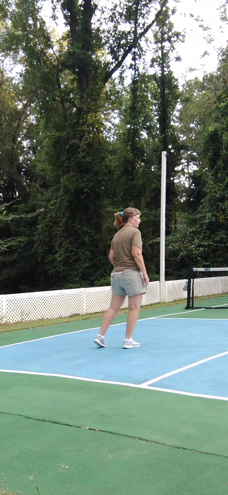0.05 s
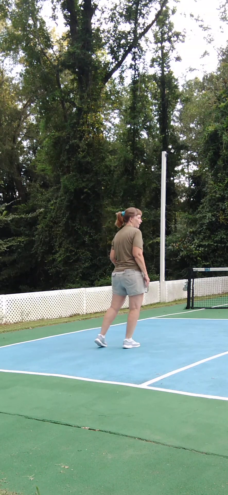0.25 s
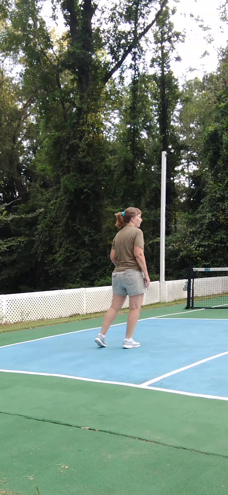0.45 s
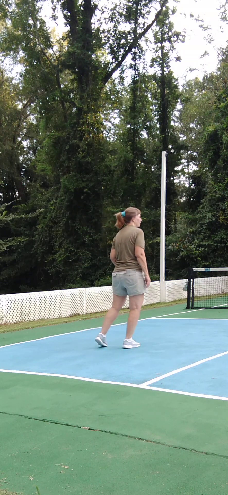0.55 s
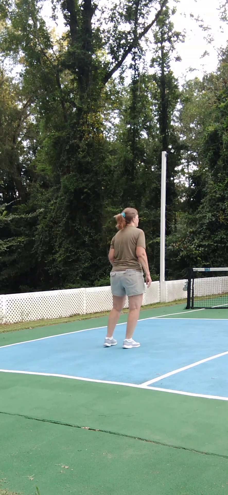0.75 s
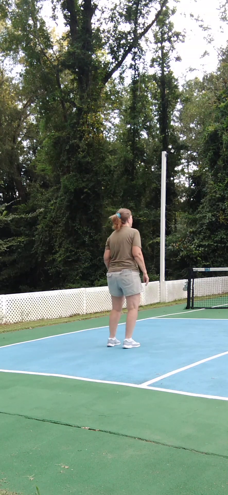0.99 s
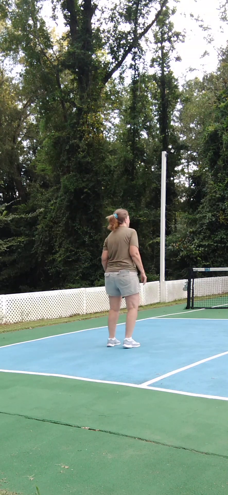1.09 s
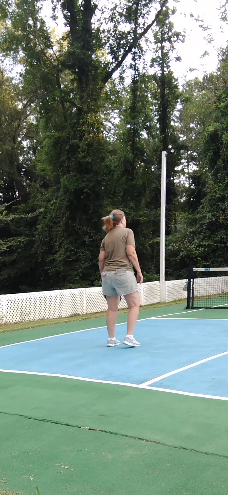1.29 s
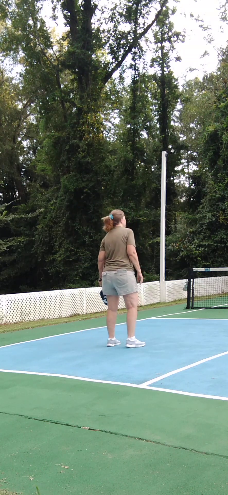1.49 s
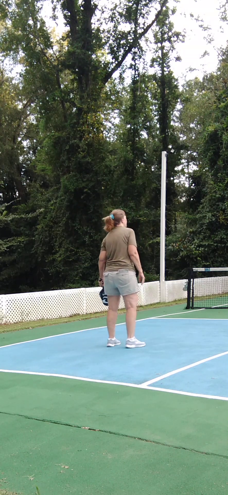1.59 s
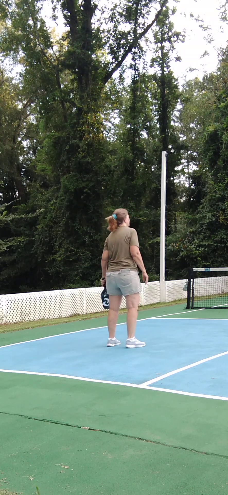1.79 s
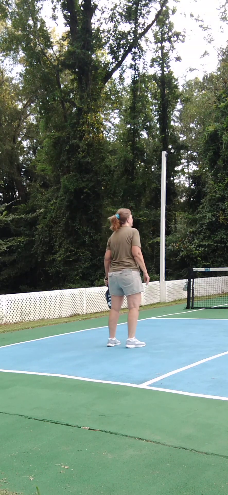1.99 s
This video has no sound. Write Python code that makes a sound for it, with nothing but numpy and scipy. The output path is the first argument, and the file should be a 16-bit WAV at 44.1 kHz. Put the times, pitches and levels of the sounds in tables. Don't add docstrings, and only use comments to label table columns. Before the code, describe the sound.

A paddle pocks a hollow plastic ball once, sharply, on an outdoor court with cicadas hissing

```python
import sys
import numpy as np
from scipy import signal
from scipy.fft import rfft, irfft
from scipy.io import wavfile
from scipy.ndimage import uniform_filter1d

SR = 44100
rng = np.random.default_rng(int(sys.argv[2]) if len(sys.argv) > 2 else 0)


def dump_mix(stems):
    frames = np.atleast_2d(stems).T
    limited = np.clip(frames, -1, 1)
    pcm = np.round(limited * 32767).astype(np.int16)
    wavfile.write(sys.argv[1], SR, pcm)


def decibels_to_gain(level_db):
    exponent = np.asarray(level_db, float) / 20
    return 10 ** exponent


N = 90404
T = np.arange(N) / SR


def shape(table, hz):
    rows = np.array(table, float)
    return np.interp(np.log(hz + 1), np.log(rows[:, 0]), rows[:, 1])


def colour(x, gain_db):
    y = irfft(rfft(x) * decibels_to_gain(gain_db(np.fft.rfftfreq(N, 1 / SR))), N)
    return y / np.sqrt(np.mean(y ** 2))


def bell(centre_hz, octaves):
    return lambda hz: -4.3 * (np.log2((hz + 1) / centre_hz) / octaves) ** 2


def pan(left_over_right_db):
    return left_over_right_db * np.array([[.5], [-.5]])


def pair(like_hz, grain_db=0., density=0.99):
    grains = decibels_to_gain(grain_db * rng.exponential(size=(2, N)))
    present = rng.random((2, N)) < density
    mid, side = rng.standard_normal((2, N)) * grains * present
    side = signal.lfilter(*signal.butter(2, np.clip(like_hz, 20, 9000), "high", fs=SR), side)
    return mid + np.array([[1], [-1]]) * side


def walk(rate_hz):
    k = int(SR / rate_hz)
    held = np.repeat(rng.standard_normal(N // k + 1), k)
    drift = uniform_filter1d(uniform_filter1d(held, k), k)[:N]
    return drift / drift.std()


def fade(start_s, t60_s, rise_s=.0005):
    age = np.maximum(T - start_s, 0)
    return (1 - np.exp(-age / rise_s)) * decibels_to_gain(-60 * age / np.maximum(t60_s, .003))


def hit(start_s, db, push_s, modes, echoes, echo_hz):
    radiates_hz = 210
    age = T[:SR // 4]
    out = np.zeros((2, N))
    push = np.exp(-(age[:40] / push_s - 2) ** 2)
    push = push / push.sum()
    for lag, left_db, right_db in [(0, 0, 0), *echoes]:
        is_echo = lag > 0
        turn = rng.uniform(-0.96, 1, (2, len(modes)))
        at = int((start_s + lag) * SR)
        for c, side_db in enumerate((left_db, right_db)):
            ring = np.zeros(len(age))
            for k, (hz, mode_db, t60) in enumerate(modes):
                phase = np.pi * (is_echo * turn[0, k] + c * turn[1, k] * min(hz / 4200, 1) ** 1.5)
                treble_only = min(hz / echo_hz, 1) ** (2 * is_echo)
                ring += decibels_to_gain(mode_db - 60 * age / t60) * treble_only * np.sin(2 * np.pi * hz * age + phase)
            out[c, at:at + len(age)] += decibels_to_gain(db + side_db) * np.convolve(ring, push)[:len(age)]
    return signal.sosfilt(signal.butter(2, radiates_hz, "high", fs=SR, output="sos"), out)


def scatter(start_s, db, spectrum, t60s, like_hz):
    freqs = np.fft.rfftfreq(N, 1 / SR)
    noise = rfft(colour(pair(like_hz), lambda hz: shape(spectrum, hz)))
    tail = np.zeros((2, N))
    for hz in 45 * 2 ** np.arange(0, 9, .5):
        window = np.clip(1 - 2 * abs(np.log2((freqs + 1) / hz)), 0, 1)
        tail += irfft(noise * window, N) * fade(start_s, shape(t60s, hz), rise_s=.002)
    return decibels_to_gain(db) * tail


def opening_db():
    # (opens [s], starts closing [s], lift [dB])
    openings = [
        (-.05, 0.043, 17.5),
        (0.26, 0.318, 18.5),
        (0.630, 0.776, 16.5),
        (.812, .888, 19),
        (1.05, 1.122, 1),
        (1.409, 1.436, 9),
        (1.69, 1.817, 19),
        (1.86, 1.895, 15.5),
    ]
    open_s, close_db_per_s = .006, 193
    lifts = []
    for opens, closes, db in openings:
        opening = db * (T - opens) / open_s
        closing = db - close_db_per_s * (T - closes)
        lifts.append(np.clip(np.minimum(opening, closing), 0, db))
    return np.max(lifts, axis=0)


def trees():
    # (frequency [Hz], level per Hz [dB])
    cicada = [(5000, -42), (6600, -29), (7500, -15), (8000, -3), (8600, 4), (9000, -4), (9500, -21.5),
              (11200, -36)]
    # (frequency [Hz], level per Hz [dB])
    air = [(15, -51.5), (25, -18), (48, -0.5), (317, -16), (354, -6.5), (390, -22), (6740, -37.5),
           (8360, 0), (16000, -49)]
    clicks_per_s = 16000
    lift = opening_db()

    chorus = colour(pair(200, grain_db=.4, density=clicks_per_s / SR),
                    lambda hz: np.interp(hz, *np.array(cicada).T, -70, -70))
    chorus = chorus * decibels_to_gain(-61.5 + lift + .4 * walk(6) + .6 * walk(40) + pan(-2.2))

    hiss = colour(pair(200), lambda hz: -19 * (hz > 11200) - 40 * (hz < 9200))
    hiss = hiss * decibels_to_gain(-79 + .12 * lift)

    leaves = colour(pair(610), lambda hz: -3.0 * np.log2(hz / 1000 + .5) - 40 * (hz < 500) - 40 * (hz > 9200))
    leaves = leaves * decibels_to_gain(-86 + 0.49 * lift + 2.0 * walk(15))

    def rumble_db(hz):
        above = 15 * np.log2(np.maximum(hz / 600, 1))
        return shape(air, np.minimum(hz, 600)) - 14 * (hz < 44) - above

    fade_db_per_s = 4.5
    rumble = colour(pair(170), rumble_db) * decibels_to_gain(-75 - fade_db_per_s * (T - 1) + 1.2 * walk(9))
    hum = colour(pair(900), bell(352, .012)) * decibels_to_gain(-90)
    return chorus + hiss + leaves + rumble + hum


def bounce():
    # (frequency [Hz], level [dB], t60 [s])
    ball = [(310, -9, .03), (400, -7, 0.022), (560, -3, .012), (701, -4, .025), (1000, -9, .015),
            (1700, -7, .008), (2057, -6, .02), (2702, -7, .018), (4070, -3, .012), (9000, 0, 0.0072),
            (13000, -8, 0.0047)]
    # (delay [s], left [dB], right [dB])
    echoes = [(.0035, -5, -1), (.0055, 0, -7), (.0105, -12, -11), (.0148, -2, -7), (.0188, -9, -9)]
    # (frequency [Hz], level per Hz [dB])
    tail = [(220, -24), (334, 6), (700, -2), (1400, -15), (2300, -4), (4000, -12), (7000, -3), (16000, -12)]
    # (frequency [Hz], t60 [s])
    decay = [(200, .15), (600, .2), (2400, .34), (4000, .18), (9000, .33), (15000, .11)]
    start_s, radiates_hz = 1.6967, 240
    direct = hit(start_s, -38, .00002, ball, echoes, echo_hz=500)
    both = direct + scatter(start_s, -48, tail, decay, 700)
    return signal.sosfilt(signal.butter(3, radiates_hz, "high", fs=SR, output="sos"), both)


def ticks():
    # (time [s], peak level [dB], centre [Hz], width [octaves])
    snaps = [(.819, -44.5, 5000, 0.58), (.869, -43, 2000, 1.13), (0.885, -50, 1290, 1.2),
             (.918, -58, 1600, 0.74), (.8492, -48, 5500, .6), (.6415, -34, 7000, .5),
             (1.412, -50, 5800, 1.0), (1.6966, -44, 14500, .2), (1.7121, -42, 9500, .5),
             (1.7158, -30, 8900, .3), (1.876, -51, 6000, 0.4)]
    out = np.zeros(N)
    for s, db, hz, octaves in snaps:
        impulse = 1. * (np.arange(N) == int(s * SR))
        click = colour(impulse, bell(hz, octaves))
        out += decibels_to_gain(db) * click / abs(click).max()
    return out


def steps():
    # (time [s], level [dB], centre [Hz], t60 [s], width [octaves])
    small_bursts = [(.0, -62, 3920, 0.27, 0.64), (0.01, -60.5, 6560, 0.14, 0.22), (0.019, -75, 1680, 0.33, 1.1),
                    (0.449, -74, 908, 0.34, 0.76), (.49, -70, 2520, .08, 1.3), (0.82, -61.5, 3360, 0.077, 0.28),
                    (.844, -56, 3300, 0.09, 0.25), (.845, -61, 6000, .25, 0.21), (.868, -55, 1000, .09, .45),
                    (.878, -59, 80, .35, .4), (.905, -72.5, 1710, 0.18, 1.2), (.96, -71.5, 298.8, 0.24, .4),
                    (.66, -66, 60, .3, .4), (.4, -68, 60, .6, .5), (.665, -53, 880, .05, .12),
                    (.663, -57, 1200, .06, .1), (.652, -54, 2250, .08, .15), (.658, -52, 3800, .07, .15),
                    (.284, -40, 490, .06, .2), (.280, -40, 200, .09, .25), (.33, -58, 200, .1, .3),
                    (.231, -55, 5100, .05, .06), (1.732, -60, 430, .08, .3), (1.710, -55, 330, .07, .25),
                    (1.71, -62, 2100, .06, .15), (1.697, -66, 15650, .35, .02), (.86, -71, 200, .5, .5),
                    (1.866, -76, 1200, .06, .6), (.812, -66, 6000, .12, .2), (.87, -62, 5900, .15, .2),
                    (.913, -68, 1500, .04, .3), (1.885, -69, 6300, .25, .2), (1.049, -77, 2274, 0.24, 0.25),
                    (1.1, -84, 2380, .25, 0.25), (1.28, -77, 1100, .6, .9), (1.411, -71, 4500, .12, 1.4),
                    (1.863, -69.5, 4050, 0.087, 1.2), (1.870, -59, 5900, .06, .25), (.7, -62, 5900, .45, .25)]
    grit = pair(1700, grain_db=1.5)
    out = np.zeros((2, N))
    for s, db, hz, t60, octaves in small_bursts:
        out += decibels_to_gain(db) * colour(grit, bell(hz, octaves)) * fade(s, t60, rise_s=t60 * 0.013)
    return out


def scuff():
    # (time [s], level [dB])
    slide = [
        (.632, -93),
        (0.64, -63),
        (0.6398, -51),
        (0.651, -46),
        (0.652, -34.5),
        (0.666, -39),
        (0.684, -50.5),
        (0.711, -60),
        (.78, -81.5),
    ]
    # (frequency [Hz], level per Hz [dB])
    spectrum = [(450, -38), (880, -19), (1500, -21.5), (2300, -15), (6500, -11), (8600, 3), (10300, -14),
                (16000, -33)]
    gain_db, low_lag_s, split_hz = 10, .011, 4700
    grit = colour(pair(1800, grain_db=1.5, density=.7), lambda hz: shape(spectrum, hz))
    low = signal.sosfiltfilt(signal.butter(3, split_hz, fs=SR, output="sos"), grit)
    s, db = np.array(slide).T
    now = decibels_to_gain(np.interp(T, s, db, -140, -140) + gain_db)
    later = decibels_to_gain(np.interp(T - low_lag_s, s, db, -140, -140) + gain_db)
    return (grit - low) * now + low * np.minimum(now, later) * decibels_to_gain(pan(3.0))


def pock():
    # (frequency [Hz], level [dB], t60 [s])
    paddle = [(95, -8, .08), (162.6, -14, .1), (264, -13, .06), (346, -11, .07), (415, -1.5, .016),
              (560, -10, .035), (850, -12, .04), (1268, -11, .14), (2030, -3, .009), (3135, -21, .07),
              (4370, -4, .008), (8140, -0.5, 0.0058), (9300, -6, 0.006), (14500, -13.5, .005)]
    # (delay [s], left [dB], right [dB])
    echoes = [(.0012, -7.5, 2.5), (.0036, 3.5, -4), (.0056, -5, -6), (.008, -9, -8.5), (.013, -11.5, -7.5),
              (.016, -9, -13.5), (0.0237, -12, -11)]
    # (frequency [Hz], level per Hz [dB])
    tail = [(60, -15), (238, -3), (566, -4), (1100, -13), (2300, -18), (6000, -17), (8500, -7),
            (16000, -29)]
    # (frequency [Hz], t60 [s])
    decay = [(60, .22), (300, .34), (1000, .24), (3000, .3), (8000, .24), (15000, .24)]
    start_s = .2380

    late = colour(pair(619), bell(3500, 0.69))
    late = late + decibels_to_gain(-8) * colour(pair(900), bell(1350, .12))
    late = late + decibels_to_gain(-6) * colour(pair(900), bell(3150, .05))
    late = late * fade(start_s, .8) * decibels_to_gain(-59.5)

    near = hit(start_s, -10.5, .00002, paddle, echoes, echo_hz=2950)
    near = near + scatter(start_s, -22.5, tail, decay, 450)
    near = near * decibels_to_gain(pan(.4))

    cut_s, cut_db_per_s, cut_db = .295, 900, 14
    low = signal.sosfiltfilt(signal.butter(2, 6200, fs=SR, output="sos"), near)
    kept = decibels_to_gain(-np.clip(cut_db_per_s * (T - cut_s), 0, cut_db))
    return near - low * (1 - kept) + late


def scene():
    return trees() + bounce() + ticks() + steps() + scuff() + pock()


def low_pass(x):
    return signal.sosfilt(signal.butter(12, 16670, fs=SR, output="sos"), x)


def record(dry):
    top_hz = 15900
    mix = signal.sosfilt(signal.ellip(6, .2, 30, top_hz, fs=SR, output="sos"), dry)
    return low_pass(mix)


dry = scene()
out = record(dry)
dump_mix(out)
```